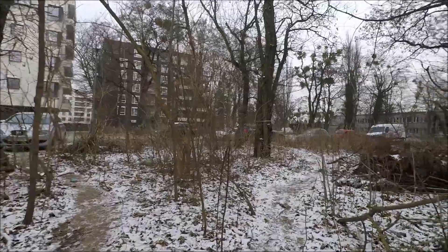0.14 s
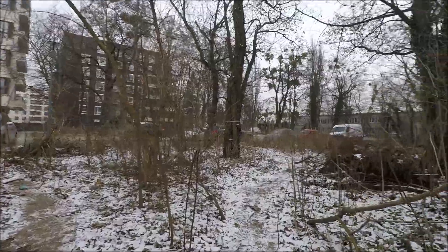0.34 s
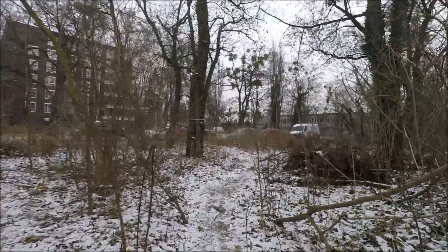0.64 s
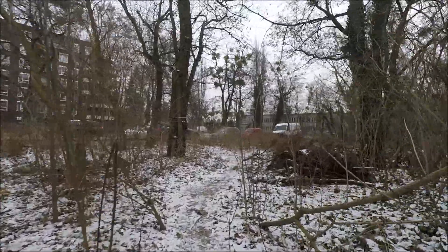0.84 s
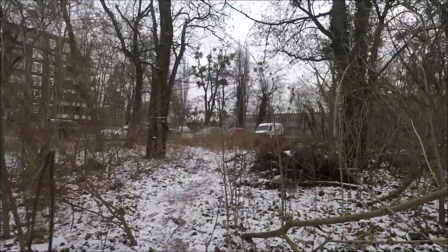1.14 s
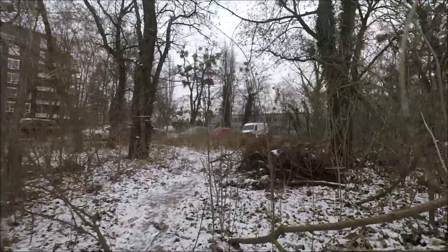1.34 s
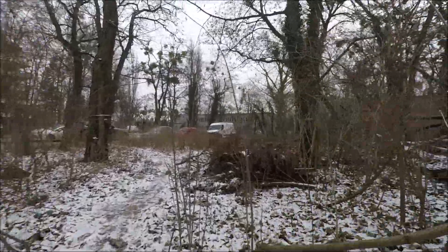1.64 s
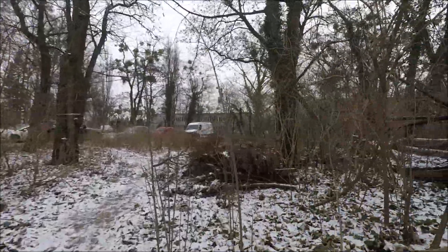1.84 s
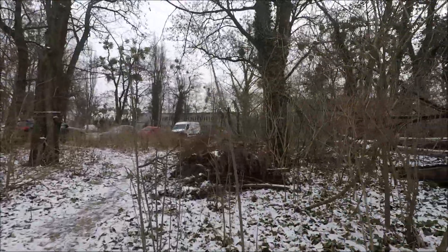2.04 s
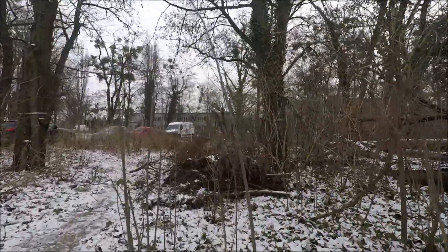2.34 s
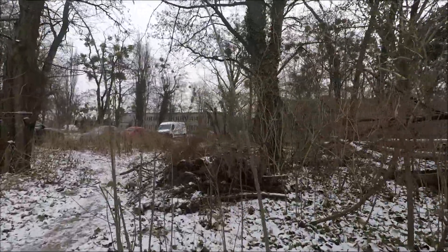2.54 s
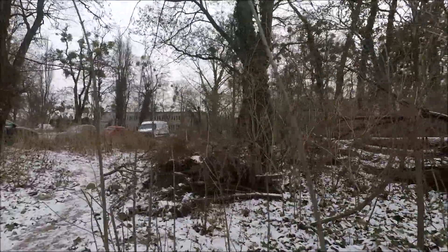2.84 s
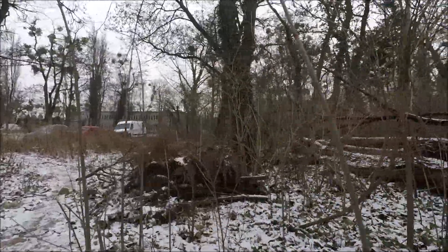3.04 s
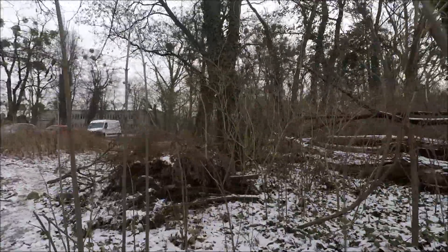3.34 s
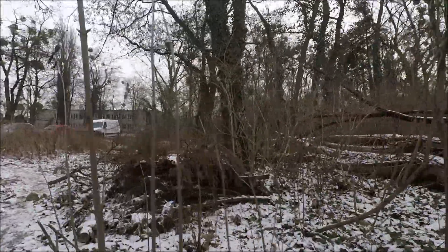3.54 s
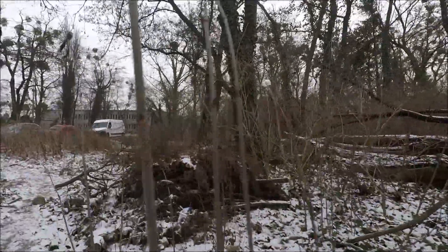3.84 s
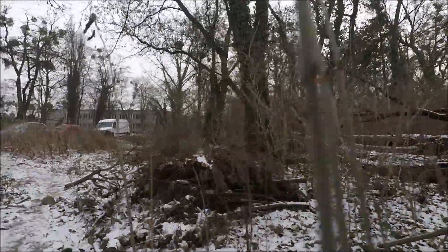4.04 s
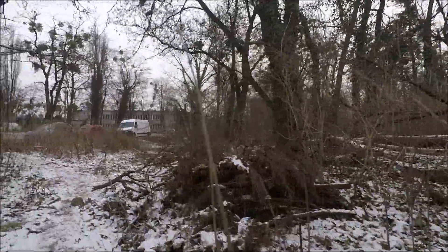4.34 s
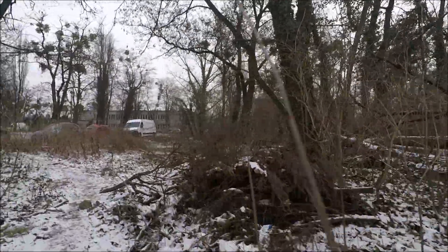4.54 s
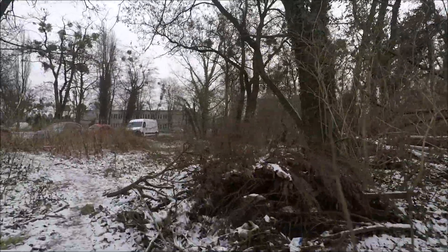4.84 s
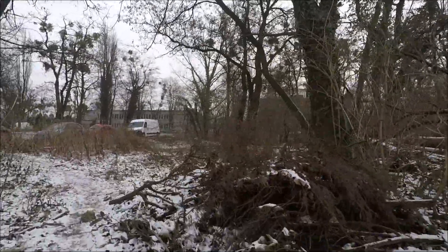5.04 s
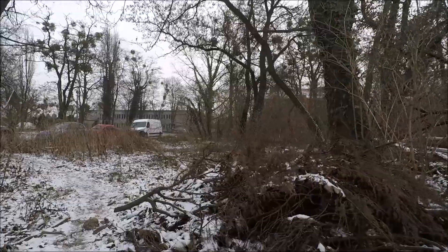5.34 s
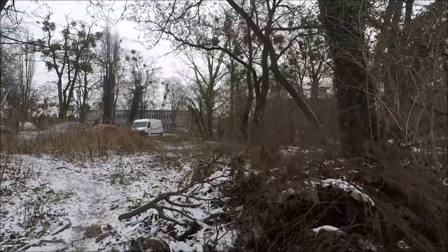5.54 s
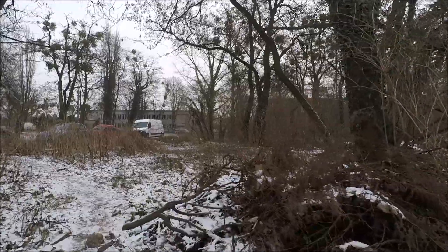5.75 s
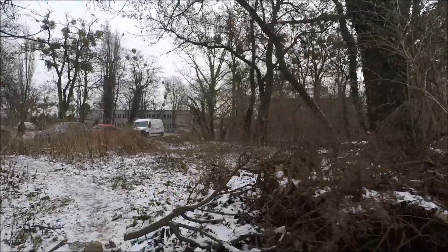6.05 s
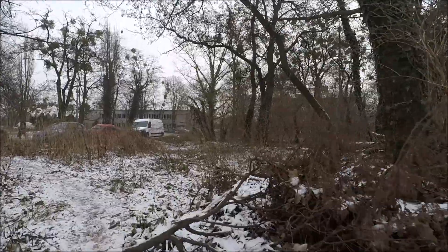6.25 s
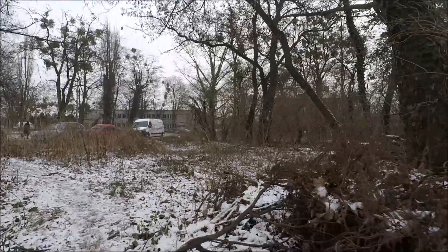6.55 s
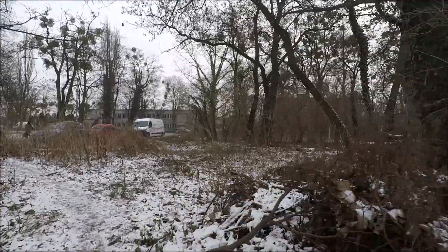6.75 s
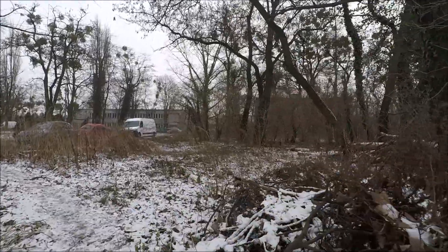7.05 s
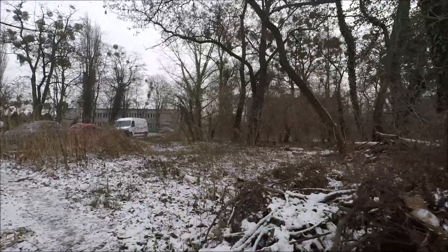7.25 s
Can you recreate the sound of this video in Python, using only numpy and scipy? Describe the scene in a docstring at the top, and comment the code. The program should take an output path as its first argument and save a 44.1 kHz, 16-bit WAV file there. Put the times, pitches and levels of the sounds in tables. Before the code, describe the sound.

Distant road traffic makes a steady low rumble outdoors. Close to the microphone, someone walks through thin snow with faint, uneven crunches, light clothing swishes and small twig crackles. About halfway, a few dull handling thumps come with a sharp twig snap. A crisper step follows, a far engine faintly passes, and another twig cracks near the end.

```python
"""Overgrown grounds near a road: someone walks through thin snow and dead twigs with a small camera.
Traffic rumbles all the while; one engine drones low, later another passes with falling pitch.
Close by, the camera hisses, hums and thumps when jolted, and clothing swishes as fabric rubs on fabric.
Twigs crackle and snap, and each boot crunches as it breaks the crust and packs the snow beneath."""
import sys
import numpy as np
from scipy.fft import rfft, irfft, next_fast_len
from scipy.io import wavfile
from scipy.ndimage import map_coordinates

SR = 44100
rng = np.random.default_rng(int(sys.argv[2]) if len(sys.argv) > 2 else 0)


def wav_record(signal):
    """Record a signal, one row per channel, as 16-bit PCM in the file named by sys.argv[1]."""
    frames = np.transpose(np.atleast_2d(signal))
    bounded = np.clip(frames, -1, 1)
    # unit amplitude maps onto the largest positive 16-bit level
    quanta = np.round(bounded * 32767).astype(np.int16)
    wavfile.write(sys.argv[1], SR, quanta)


N = 326340


def amp(db):
    """Decibels to gain."""
    return 10 ** (np.asarray(db) / 20)


def unit(x):
    """Scale to rms 1."""
    return x / np.sqrt(np.mean(x ** 2) + 1e-20)


def eq_db(points, hz):
    """Read an EQ curve between its points on a log frequency axis."""
    point_hz, point_db = np.transpose(points)
    return np.interp(np.log(hz + 1), np.log(point_hz + 1), point_db)


def clock():
    """The time of every sample in seconds."""
    return np.arange(N) / SR


def automation(rows):
    """One curve for each column after the time."""
    times, *columns = np.transpose(rows)
    return [np.interp(clock(), times, column) for column in columns]


def wobble(rate):
    """A smooth random curve, rate knots a second."""
    return map_coordinates(rng.standard_normal(int(N * rate / SR) + 4), [clock() * rate])


def press(start, length, rise, fall):
    """An envelope that ramps up, holds and dies away; all times in seconds."""
    age = clock() - start
    attack = np.clip(age / rise + .5, 0, 1)
    return attack * np.exp(-np.maximum(age - length + fall / 2, 0) / fall)


def filtered(x, response):
    """Filter x by a gain given as a function of frequency."""
    size = next_fast_len(N + SR // 2)
    return irfft(rfft(x, size) * response(np.fft.rfftfreq(size, 1 / SR)), size)[:N]


def narrow_noise(centre_hz, half_width_hz):
    """Noise in one resonant band, rms 1."""
    white = rng.standard_normal(N)
    return unit(filtered(white, lambda hz: 1 / (1 + ((hz - centre_hz) / half_width_hz) ** 2)))


# EQ of the cavity in front of the microphone: (frequency [Hz], gain [dB])
HOUSING_EQ = [(410, -0.5), (490, -5.5), (560, -15), (660, -4.5), (810, -1), (960, -4.5), (1090, -12),
              (1220, -3), (1690, 2), (1760, -4), (3350, -5.5), (3700, -2.5), (11000, -2.5), (11250, -5)]
def through_housing(x, source_eq):
    """Shape x with a source's EQ and the peaks and notches of the housing, rms 1."""
    return unit(filtered(x, lambda hz: amp(eq_db(source_eq, hz) + eq_db(HOUSING_EQ, hz))))


def noise(source_eq):
    """Smooth noise heard through the housing, rms 1."""
    return through_housing(rng.standard_normal(N), source_eq)


def grains(source_eq, rate, spread_db):
    """Tiny clicks at random moments, rate a second, most weak and a few strong; rms 1."""
    hits = rng.random(N) < rate / SR
    strength = amp(spread_db * np.minimum(rng.standard_exponential(N), 4))
    return through_housing(hits * strength * rng.choice([-1, 1], N), source_eq)


# Thin tones of the camera electronics: (frequency [Hz], level [dB])
WHINE_TONES = [(11000, -86), (11050, -88), (12950, -96), (13000, -95)]
# Airy noise floor: (frequency [Hz], gain [dB])
HISS_EQ = [(600, -23), (2000, -4.5), (4000, -6), (5800, -5), (6700, -1.5), (7600, -4.5), (10500, -6),
           (12500, -11), (15000, -17)]
def camera_hiss():
    """The microphone hisses steadily and the electronics add a faint whine."""
    whine = sum(amp(db) * np.sqrt(2) * np.sin(2 * np.pi * (hz * clock() + rng.random()))
                for hz, db in WHINE_TONES)
    return amp(-67.5) * noise(HISS_EQ) + whine


def housing_hum():
    """A faint, fuzzy hum near 400 Hz rings in the camera housing."""
    return amp(-71) * narrow_noise(centre_hz=401.7, half_width_hz=8.8)


# Heavy traffic swells and recedes: (time [s], level [dB])
RUMBLE_LEVELS = [(0.0, -38.5), (1.0, -41.5), (2.3, -41.5), (5.1, -38.5), (6.5, -44.5), (7.4, -41)]
# Deep traffic rumble and broader tyre roar: (frequency [Hz], gain [dB])
RUMBLE_EQ = [(10, -11), (20, -1), (45, 1.5), (78, -2.5), (115, -8.5), (170, -20.5), (400, -61), (900, -110)]
TYRE_EQ = [(60, -18), (120, 1), (190, -0.5), (290, -7), (400, -13), (520, -17.5), (800, -20), (1600, -25),
           (3000, -30), (6000, -51.5)]
def road():
    """The traffic bed: heavy vehicles rumble and tyres roar steadily."""
    rumble_db, = automation(RUMBLE_LEVELS)
    rumble = amp(rumble_db) * noise(RUMBLE_EQ)
    tyres = amp(-52.5) * noise(TYRE_EQ)
    return rumble + tyres


# A low drone, then a pass-by falling in pitch: (time [s], pitch [Hz], level [dB])
DRONING_ENGINE = [(0.5, 40.02, -45), (0.85, 40.28, -36.5), (1.3, 41.34, -34), (1.7, 41.53, -39.5),
                  (1.95, 42.85, -40.5), (2.25, 43.54, -41), (3.0, 43.7, -40.5)]
PASSING_ENGINE = [(4.8, 127, -55), (5.45, 115, -51), (5.95, 112, -51), (6.3, 104, -53), (6.9, 97, -54)]
def engine(track):
    """Of a distant engine only the wavering firing tone carries."""
    hz, db = automation(track)
    start, end = track[0][0], track[-1][0]
    fade = press(start, end - start, rise=0.11, fall=0.08)
    firing_tone = np.sqrt(2) * np.sin(2 * np.pi * np.cumsum(hz) / SR)
    return fade * amp(db + wobble(3.8)) * firing_tone


# Handling thumps: (time [s], level [dB], pitch [Hz])
CAMERA_JOLTS = [(3.579, -28.5, 56.6), (4.091, -28.5, 75), (4.206, -26.5, 57.6), (6.028, -38, 71)]
def camera_jolts():
    """Each jolt of the hand shakes the camera for a few slow cycles."""
    out, t = np.zeros(N + SR), np.arange(SR // 4) / SR
    peak_s = 0.018
    envelope = t / peak_s * np.exp(1 - t / peak_s)
    for start, db, hz in CAMERA_JOLTS:
        out[round(start * SR):][:len(t)] += amp(db) * envelope * np.sin(2 * np.pi * hz * t)
    return out[:N]


def stroke(middle, length):
    """A rub gathers speed, is fastest at its middle and slows again."""
    return np.exp(-(2 * (clock() - middle) / length) ** 2)


# A leg or sleeve swings past the body: (middle time [s], length [s], level [dB])
LIMB_SWINGS = [(0.53, 0.1, -64.5), (0.68, 0.12, -62.5), (1.18, 0.26, -64), (1.85, 0.12, -66.5),
               (2.56, 0.29, -65), (3.16, 0.098, -66), (4.19, 0.33, -65), (4.78, 0.18, -59.5),
               (5.12, 0.7, -63), (5.89, 0.099, -65), (6.15, 0.32, -63.5), (6.53, 0.25, -69),
               (6.85, 0.25, -63.5), (7.05, 0.13, -66)]
# Bright fabric swish: (frequency [Hz], gain [dB])
CLOTH_EQ = [(800, -21), (3000, -19), (4500, -6.5), (6500, 0.5), (7800, -3), (9500, -3), (11000, -13.5),
            (15000, -20.5)]
def clothing():
    """Fabric slides over fabric with each footfall and swing: a fine hiss that flutters as folds catch."""
    brush_db, usual_crust_db, stir_db = -60, -63, -72
    # The trouser leg brushes a little longer than its footfall, and louder on a harder one.
    brushes = [(start + length / 2, length + 0.03, brush_db + 0.27 * (crust_db - usual_crust_db))
               for start, length, crust_db, _ in FOOTFALLS]
    power = amp(stir_db) ** 2  # clothing never quite rests
    for middle, length, db in brushes + list(LIMB_SWINGS):
        power += (amp(db) * stroke(middle, length)) ** 2
    flutter = amp(0.59 * wobble(45))
    return np.sqrt(power) * flutter * grains(CLOTH_EQ, rate=9000, spread_db=3.0)


# Faint squeaks underfoot: (time [s], length [s], pitch [Hz], level [dB])
SOLE_SLIPS = [(1.587, 0.014, 4500, -61), (3.465, 0.028, 5200, -57.5), (3.508, 0.022, 5600, -65),
              (3.543, 0.084, 6940, -60), (3.635, 0.034, 6400, -60), (4.858, 0.038, 6130, -56),
              (4.912, 0.02, 6440, -53)]
def snow_squeaks():
    """Snow rubs under the sliding sole and rings in one narrow band."""
    out = np.zeros(N)
    for start, length, pitch_hz, db in SOLE_SLIPS:
        rub = narrow_noise(pitch_hz, half_width_hz=0.07 * pitch_hz)
        out += amp(db) * press(start, length, rise=0.0059, fall=0.0096) * rub
    return out


# Dry twigs and leaves give way: (time [s], length [s], level [dB])
LITTER_CRUSHES = [(4.123, 0.016, -55.5), (4.192, 0.046, -61.5), (4.264, 0.023, -55.5), (5.012, 0.16, -63.5),
                  (5.277, 0.18, -63), (5.62, 0.025, -64.5), (6.752, 0.105, -59.5), (6.779, 0.043, -54.5),
                  (6.789, 0.0074, -52.5)]
# Brittle top end of dry twigs: (frequency [Hz], gain [dB])
TWIG_EQ = [(700, -27), (2500, -11.5), (3350, -10), (3800, -6.5), (4600, -6), (6000, -3.5), (7500, -4.5),
           (9000, -16), (11000, -16.5), (15000, -27)]
def litter_crackles():
    """Dry litter breaks under load in quick clusters of tiny fractures."""
    load = sum(amp(db) * press(start, length, rise=0.0052, fall=0.0083)
               for start, length, db in LITTER_CRUSHES)
    fractures = grains(TWIG_EQ, rate=4000, spread_db=3)
    return load * amp(wobble(140)) * fractures


# Ring of a breaking twig: (frequency [Hz], relative level [dB], time to fall 60 dB [s])
TWIG_MODES = [(3930, -3.5, 0.0053), (5260, -1, 0.0059), (5920, 2.5, 0.0048), (6680, -2, 0.01),
              (7500, -7.5, 0.01), (8950, -12, 0.01), (12100, -20, 0.0058)]
def twig_crack(t):
    """The break sets damped modes ringing, a little different in pitch and strength each time; peak 1."""
    ring = np.zeros(len(t))
    for hz, db, t60 in TWIG_MODES:
        decay = amp(db + rng.normal(0, 2.6) - 60 * t / t60)
        detuned_hz = hz * rng.normal(1, 0.018)
        ring += decay * np.sin(2 * np.pi * (detuned_hz * t + rng.random()))
    ring *= 1 - np.exp(-t / 0.00035)  # sharp attack
    return ring / np.abs(ring).max()


# Single twigs break: (time [s], crack peak [dB], knock relative to crack [dB])
TWIG_BREAKS = [(0.8, -54, 0), (1.485, -46.5, -2), (1.595, -51, -6), (2.856, -49.5, -5), (3.362, -51, -8),
               (4.2215, -26.5, -17), (4.274, -43, -23), (5.1562, -48, -6), (5.289, -48, -13),
               (5.389, -50.5, -1.5), (5.416, -48, -22), (5.4621, -50, -23), (5.5716, -46.5, -4.5),
               (5.6372, -48, -23), (5.703, -41.5, -14), (6.787, -30.5, -23), (6.7955, -37, -28),
               (6.8242, -43, -30)]
# Dull body of a thick twig: (frequency [Hz], gain [dB])
KNOCK_EQ = [(400, 0), (950, 2.5), (1500, -1), (2400, -7), (4000, 1.5), (8000, -26)]
def twig_snaps():
    """A twig cracks and rings for a moment, fibres tear around the break, and thick wood adds a knock."""
    rise_s, tear_decay_s, knock_decay_s = 0.00044, 0.0033, 0.0045
    tear_db = -15  # relative to the crack
    cracks, t = np.zeros(N + SR), np.arange(SR // 20) / SR
    tearing, knock = np.zeros(N), np.zeros(N)
    for start, db, knock_db in TWIG_BREAKS:
        cracks[round(start * SR):][:len(t)] += amp(db) * twig_crack(t)
        age = clock() - start
        tearing += amp(db + tear_db) * np.exp(-np.maximum(age / tear_decay_s, -age / rise_s))
        knock += amp(db + knock_db) * np.exp(-np.maximum(age / knock_decay_s, -age / rise_s))
    return cracks[:N] + tearing * noise(TWIG_EQ) + knock * noise(KNOCK_EQ)


# A boot sinks into the snow: (time [s], length [s], crust level [dB], packing level [dB])
FOOTFALLS = [(0.133, 0.087, -64, -66), (0.794, 0.14, -72, -68), (1.476, 0.1, -65, -66),
             (1.574, 0.026, -74, -61.5), (1.994, 0.066, -68, -67.5), (2.095, 0.082, -67, -73),
             (2.214, 0.045, -73, -82), (2.761, 0.047, -62.5, -67), (2.841, 0.062, -65.5, -67),
             (3.459, 0.058, -61.5, -61), (3.512, 0.093, -56, -68), (3.62, 0.072, -66, -70),
             (3.921, 0.16, -70, -70.5), (4.816, 0.074, -53, -60.5), (4.908, 0.028, -55.5, -58.5),
             (5.468, 0.12, -61.5, -66), (6.01, 0.048, -70, -73), (7.17, 0.061, -71.5, -84)]
# Crisp crust on top, midrange crunch below: (frequency [Hz], gain [dB])
CRUST_EQ = [(800, -16), (2500, -12), (3300, -6.5), (4000, -5.5), (5200, -4), (6500, -5.5), (8000, -10.5),
            (10000, -11.5), (15000, -22)]
PACKING_EQ = [(250, -39), (700, 8), (1500, 2), (2500, 7), (4000, -0.5), (8000, -57)]
def footsteps():
    """The crust breaks in dense bright grains while the snow beneath packs with a duller crunch."""
    crust_gain, packing_gain = np.zeros(N), np.zeros(N)
    for start, length, crust_db, packing_db in FOOTFALLS:
        weight = press(start, length, rise=0.005, fall=0.018)
        crust_gain = np.maximum(crust_gain, amp(crust_db) * weight)
        packing_gain = np.maximum(packing_gain, amp(packing_db) * weight)
    yielding = amp(0.97 * wobble(90))  # snow gives way in small jerks
    crust = crust_gain * grains(CRUST_EQ, rate=4500, spread_db=1.5)
    packing = packing_gain * grains(PACKING_EQ, rate=3500, spread_db=4.0)
    return yielding * (crust + packing)


def scene():
    """A mono mix: the walker close by, the road far off."""
    walker = footsteps() + snow_squeaks() + litter_crackles() + twig_snaps() + clothing()
    bed = road() + housing_hum() + engine(DRONING_ENGINE) + engine(PASSING_ENGINE) + camera_hiss()
    return (walker + camera_jolts() + bed)[None]


def record(dry):
    """The camera keeps nothing above its band limit."""
    top_hz = 15250
    return np.array([filtered(channel, lambda hz: hz < top_hz) for channel in dry])


dry = scene()
out = record(dry)
wav_record(out)
```